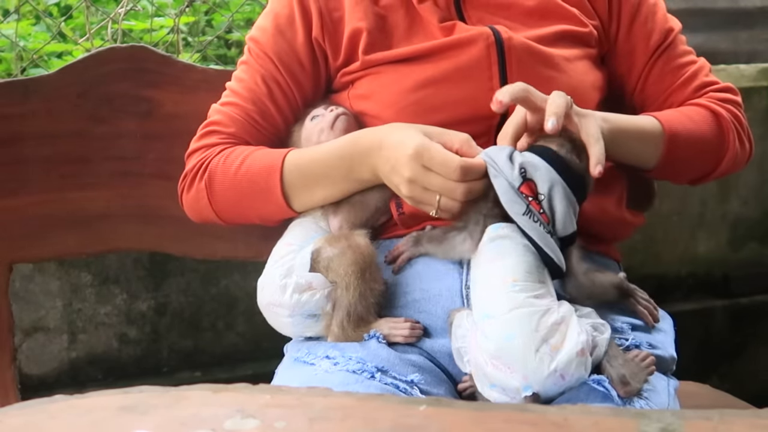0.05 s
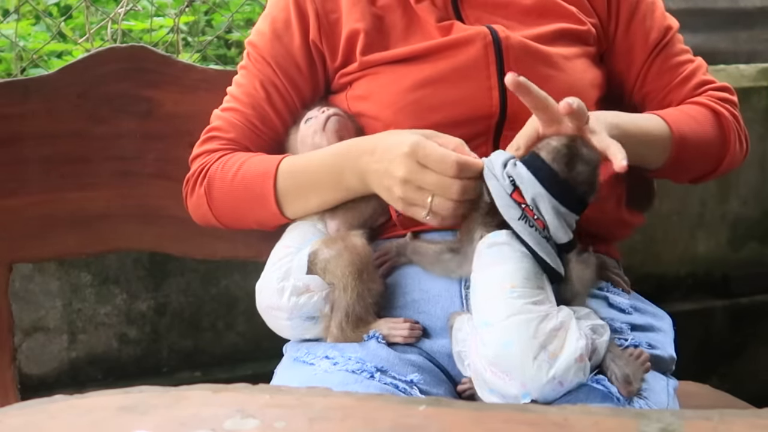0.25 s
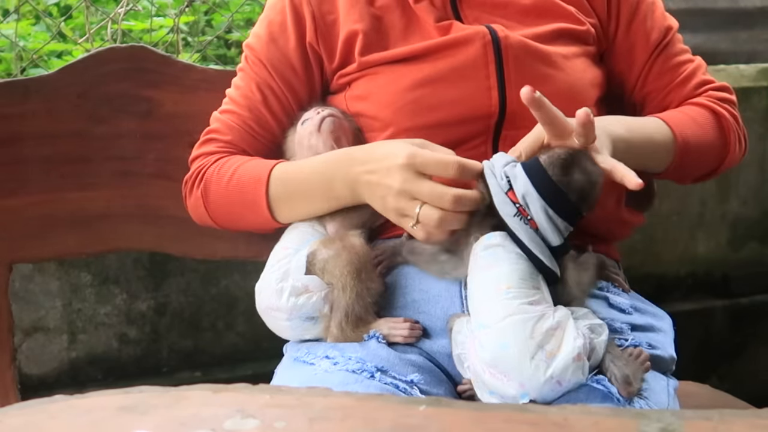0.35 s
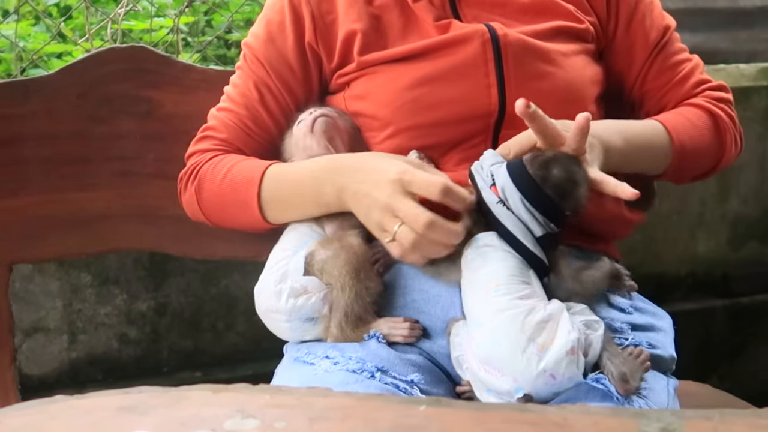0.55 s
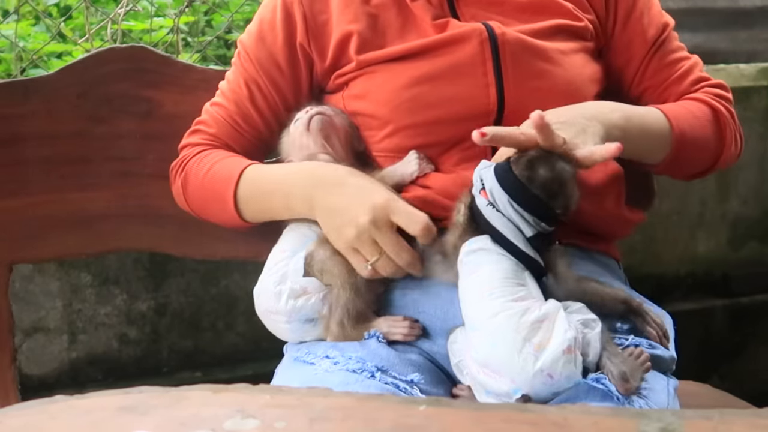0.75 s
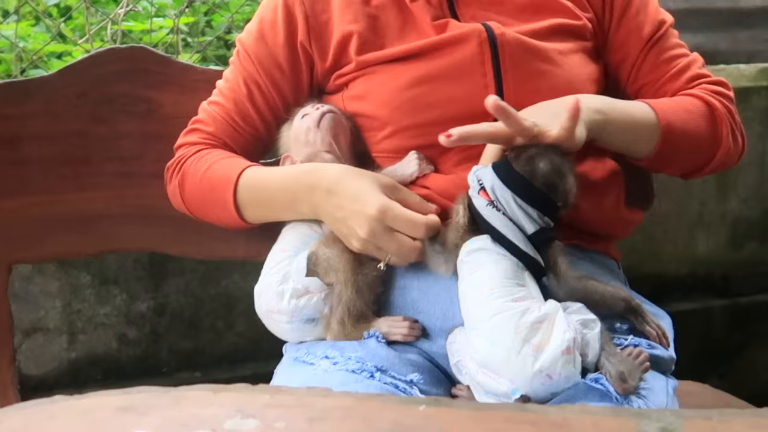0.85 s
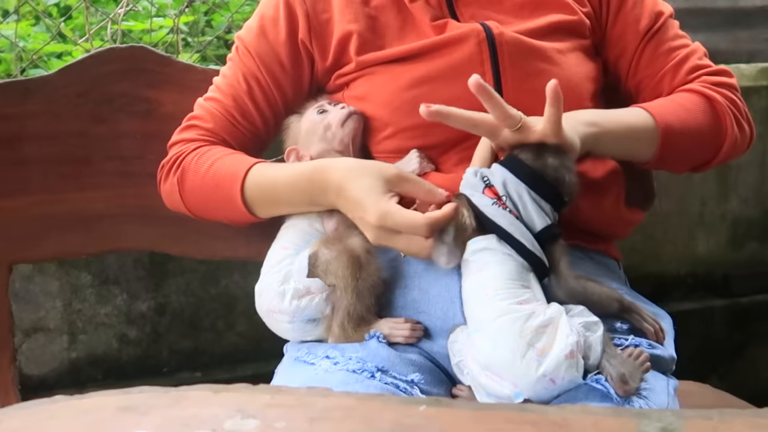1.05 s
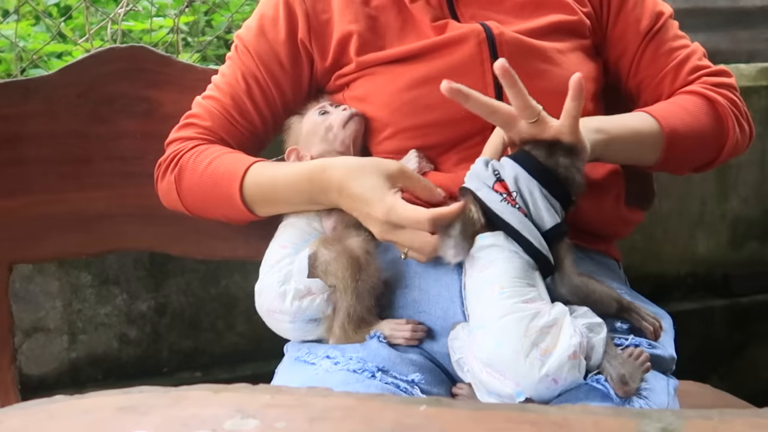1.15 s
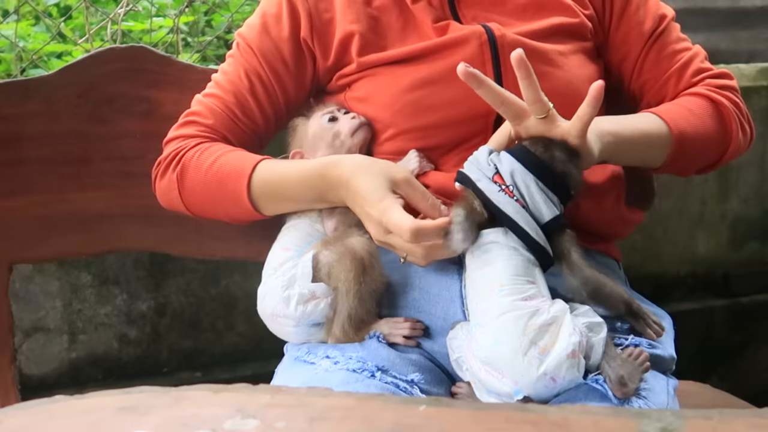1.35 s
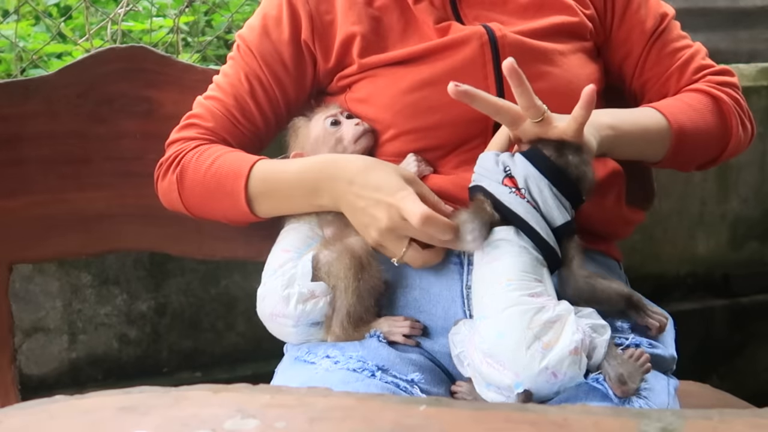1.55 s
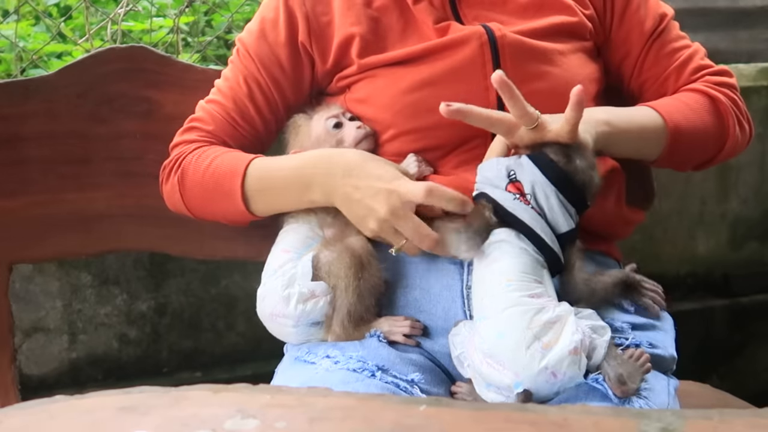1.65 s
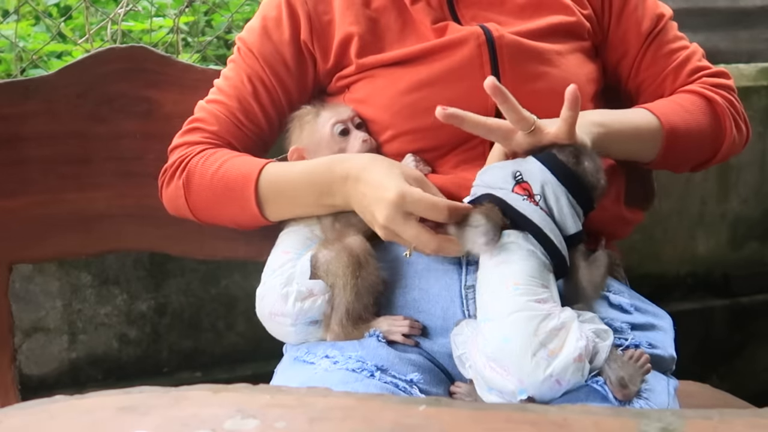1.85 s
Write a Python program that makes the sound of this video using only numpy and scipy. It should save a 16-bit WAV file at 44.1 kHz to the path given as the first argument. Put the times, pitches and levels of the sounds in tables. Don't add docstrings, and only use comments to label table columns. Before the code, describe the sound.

A baby monkey gives a quick chirp, then another nearer one holds a wavering squeal that leaps upward, breaks into thin whistling and falls into a loud cry, over cloth rustle and breeze, close under a porch.

```python
import sys
import numpy as np
from scipy import signal
from scipy.fft import rfft, irfft
from scipy.io import wavfile
from scipy.ndimage import uniform_filter1d

SR = 44100
rng = np.random.default_rng(int(sys.argv[2]) if len(sys.argv) > 2 else 0)


def makeup_ratio(level_db):
    decades = np.asarray(level_db, float) / 20
    return 10 ** decades


def persist_wave(psi):
    counts = np.round(np.clip(psi, -1, 1) * 32767).astype(np.int16)
    wavfile.write(sys.argv[1], SR, np.atleast_2d(counts).T)


N = 83790

HUM_DB = [-72, -71, -71, -71]
# [t/s, level/dB]
GUST = [
    (0.0, -36),
    (0.026, -36),
    (0.238, -38),
    (0.274, -44),
    (0.576, -40.5),
    (0.65, -51.5),
    (0.702, -39),
    (1.286, -58),
    (1.316, -62.5),
    (1.9, -91.5),
]
# [f/Hz, level/dB]
WIND = [(25, -43), (60, -20), (110, -6.5), (370, -18.5), (550, -25.5), (1000, -29), (1500, -64)]
# [t/s, level/dB]
FLUTTER = [
    (0.0, -50),
    (0.03, -34.5),
    (0.184, -29),
    (0.238, -46.5),
    (0.37, -39),
    (0.92, -61.5),
    (0.956, -49),
    (1.602, -99.5),
    (1.9, -100),
]
# [t/s, level/dB]
RUSTLE = [
    (0.0, -41),
    (0.12, -45.5),
    (0.338, -52),
    (0.724, -45.5),
    (0.888, -52),
    (1.136, -54),
    (1.258, -51),
    (1.486, -62),
    (1.666, -59.5),
    (1.9, -64.5),
]
# [f/Hz, level/dB]
CLOTH = [(100, -8.5), (300, -4.5), (600, -5), (3000, -7.5), (4500, -19.5), (7500, -23.5), (10000, -48),
         (15000, -61)]
# [f/Hz, side over mid/dB]
CLOTH_SIDE = [(60, -45), (200, -23), (380, -15), (700, -18), (1300, -12), (2400, -8), (7500, 5),
              (12000, 16)]
# [f/Hz, level/dB]
SLEEVE = [(387.5, -30), (1550, 0), (6200, -50)]
# [t/s, peak level/dB]
TICKS = [(.030, -27), (.036, -26), (.047, -26), (.061, -21), (.091, -25), (.103, -28), (.110, -26),
         (.130, -30), (.161, -28), (.370, -35), (.405, -36), (.557, -14), (.8462, -22), (1.165, -30),
         (1.205, -31), (1.570, -46), (1.663, -39), (1.672, -43)]
# [f/Hz, level/dB]
TICK_COLOUR = [(300, -22), (1500, -6), (3000, 0), (6000, -8), (10000, -10), (15000, -24)]
# [f/Hz, left leads/rad]
PORTS = [(100, 0), (1900, .2), (2400, .9), (3500, 1.3), (4600, 2.2), (6000, 2.5), (10000, 3.15),
         (12500, 3.85)]
# [f/Hz, left over right/dB]
PAN = [(1000, 0), (2300, 1), (3500, 2.5), (4700, 1.6), (6000, 0)]
# [f/Hz, level/dB]
ECHO = [(2000, -2), (3200, 2), (4200, -1), (6100, -4), (7500, 0), (10000, -5), (12300, 4), (15000, -16)]

# [t/s, f/Hz, level/dB, roughness 0-1]
PEEP = [
    (.2135, 3000, -40, .05),
    (.2155, 3000, -29, .05),
    (.218, 2950, -42, .1),
]
# [t/s, f/Hz, level/dB, roughness 0-1]
CHIRP = [(.2235, 3060, -18, .05), (.2285, 3110, -9, .05), (.2315, 3130, -9, .1), (.2345, 3150, -16, .2),
         (.237, 3150, -28, .5), (.2395, 3300, -11, .3), (.2415, 3400, -24, .4), (.245, 3600, -12, .3),
         (.252, 3720, -11, .16), (.260, 3800, -13, .06), (.270, 4080, -11, .03), (.278, 4130, -11, .03),
         (.282, 4120, -16, .05), (.291, 4080, -21, .06), (.295, 3750, -20, .06), (.2985, 3250, -32, .1)]
# [t/s, f/Hz, level/dB, roughness 0-1]
SQUEAL = [(.456, 2130, -30, .02), (.459, 2140, -19, .02), (.474, 2200, -14, .02), (.492, 2180, -15, .02),
          (.508, 2300, -12, .02), (.538, 2380, -14, .02), (.548, 2275, -17, .02), (.575, 2320, -15, .02),
          (.608, 2385, -19, .02), (.636, 2352, -13, .02),
          (.668, 2382, -20, .03), (.695, 2440, -15, .03), (.716, 2370, -20, .04), (.75, 2340, -17, .04),
            (.762, 2365, -17, .05), (.776, 2490, -14, .08), (.79, 2410, -19, .08), (.803, 2365, -24, .08),
            (.816, 2360, -21, .05), (.836, 2400, -17, .05), (.8465, 2520, -14, .1)]
# [t/s, f/Hz, level/dB, roughness 0-1]
RISE = [(.8462, 3700, -8, .08), (.851, 3580, -13, .04), (.869, 3420, -14, .03), (.884, 3400, -25, .04),
        (.895, 3530, -13, .03), (.906, 3850, -11, .04), (.913, 4150, -9, .06), (.917, 4450, -22, .2),
        (.926, 4750, -25, .3), (.946, 5100, -26, .35), (.955, 5650, -19, .2), (.985, 6620, -29, .35),
        (1.008, 6850, -33, .5), (1.025, 7600, -27, .3), (1.038, 8400, -31, .5), (1.048, 8600, -41, .9),
        (1.07, 9000, -44, 1)]
# [t/s, f/Hz, level/dB, roughness 0-1]
GASP = [
    (1.03, 8000, -42, 1),
    (1.05, 8000, -36, 1),
    (1.09, 8000, -41, 1),
    (1.15, 8000, -52, 1),
]
# [t/s, f/Hz, level/dB, roughness 0-1]
WHISTLE = [(1.04, 11500, -31, .4), (1.055, 12200, -36, .5), (1.07, 12750, -27, .3), (1.076, 12500, -31, .4),
           (1.080, 11100, -24, .25), (1.097, 11800, -31, .4), (1.102, 12480, -21, .15),
           (1.122, 12300, -23, .3), (1.136, 13150, -19, .2), (1.148, 13200, -20, .2),
           (1.160, 12600, -18, .25), (1.176, 12750, -19, .3), (1.188, 13220, -16, .08),
           (1.203, 13270, -17, .1), (1.212, 11600, -23, .4)]
# [t/s, f/Hz, level/dB, roughness 0-1]
FALL = [(1.2, 8100, -33, .4), (1.212, 7500, -21, .3), (1.226, 6500, -23, .35), (1.24, 6120, -14, .15),
        (1.252, 5950, -18, .3), (1.262, 6050, -13, .2), (1.265, 5400, -19, .3), (1.279, 5100, -20, .3),
        (1.29, 4250, -4, .02), (1.304, 3750, -9, .02), (1.307, 3450, -15, .05), (1.313, 3150, -40, .1)]
CHIRP_DB = [1, -45]
SQUEAL_DB = [-12, -1.5, -9, -20.5, -34.5, -34.5]
RISE_DB = [0, -20, -29, -35]
FALL_DB = [0, -33, -31]
# [f/Hz, level/dB]
BREATH = [(2400, -32), (3400, -8), (4500, 0), (6000, 0), (7500, -4), (9500, -9), (12500, -5), (15500, -14)]
CHIRP_BREATH = BREATH[:4] + [(9000, -28)]
SQUEAL_BREATH = BREATH[:3] + [(5500, -14.5), (15500, -18.5)]
GASP_BREATH = BREATH[:4] + [(8000, -3), (9500, -25)]
WHISTLE_BREATH = [(2400, -27), (4000, -9), (6000, -13), (8000, -6),
                  (9500, -4), (12500, 3), (14000, 0), (15500, -12)]

NEAR_SIDE, FAR_SIDE = 0.88, -0.39
HALF_TONE_DB, SHAKE_HZ, JITTER, EDGE_S = -19.5, 268, 0.014, 0.00062
RASP_HZ, RASP_DB = 1800, 0
OPEN_DB, OPEN_S = -24, .09
STRAIN_DB = 45
WALL_S, FIRST_DB = .014, -8
ROOM_DB, ROOM_T60_S, TAIL_DB, TAIL_T60_S = -12, 0.21, -23.5, 0.57
BRUSH_S, BRUSH_DB, BRUSH_T60_S = .557, -41, .6
DUCK_S, DUCK_DB, RECOVER_S = 1.296, -18, .09


def shape(table):
    hz, db = np.transpose(table)
    log_hz = np.log(np.arange(N // 2 + 1) * SR / N + 1)
    return np.interp(log_hz, np.log(hz), db)


def colour(x, table):
    return irfft(rfft(x) * makeup_ratio(shape(table)), N)


def unit(x):
    return x / np.sqrt(np.mean(x ** 2))


def curve(table, axis=1):
    table = np.array(table)
    return np.interp(np.arange(N) / SR, table[:, 0], table[:, axis])


def walk(hz):
    k = max(int(SR / hz), 1)
    return unit(uniform_filter1d(uniform_filter1d(rng.standard_normal(N), k), k))


def ports(x, side):
    lead = side * np.array([[1], [-1]]) / 2
    return irfft(rfft(x) * np.exp(1j * lead * shape(PORTS)) * makeup_ratio(lead * shape(PAN)), N)


def motor_hum():
    t = np.arange(N) / SR
    return sum(makeup_ratio(db + 3 * walk(20)) * np.sin(2 * np.pi * 297 * (k + 1) * t) for k, db in enumerate(HUM_DB))


def air(table, flicker_db):
    mid = rfft(rng.standard_normal(N)) * makeup_ratio(shape(table))
    side = rfft(rng.standard_normal(N)) * makeup_ratio(shape(table) + shape(CLOTH_SIDE))
    octaves = np.log2(np.arange(N // 2 + 1) * SR / N + 1)
    out = 0
    for octave in range(4, 15):
        band = np.clip(1 - abs(octaves - octave), 0, 1)
        stereo = irfft(mid * band, N) + np.array([[1], [-1]]) * irfft(side * band, N)
        out = out + makeup_ratio(flicker_db * walk(18.2)) * stereo
    return unit(out)


def breeze():
    level = makeup_ratio(curve(FLUTTER) + 1 + 2.2 * walk(12))
    hz = 53 * (1 + 0.13 * walk(13))
    flutter = level * np.sin(2 * np.pi * np.cumsum(hz) / SR)
    return makeup_ratio(curve(GUST)) * air(WIND, flicker_db=0.5) + flutter


def rustle():
    return makeup_ratio(curve(RUSTLE) + 6) * air(CLOTH, flicker_db=3.5)


def brush():
    t = np.arange(N) / SR - BRUSH_S
    drag = unit(colour(rng.standard_normal(N), SLEEVE))
    return (t > 0) * makeup_ratio(BRUSH_DB - 60 * np.abs(t) / BRUSH_T60_S) * drag


def ticks():
    out, n = np.zeros(N), np.arange(400)
    for s, db in TICKS:
        i = int(s * SR)
        grain = rng.standard_normal(len(n))
        out[i:i + len(n)] += makeup_ratio(db) * grain * np.exp(-n / SR / .0011)
    return colour(out, TICK_COLOUR)


def porch(x):
    t = np.arange(SR) / SR
    near, far = rng.standard_normal((2, 2, SR)) * (t > .004) / 40
    far = signal.lfilter(*signal.butter(2, 7500, fs=SR), far)
    early = near * makeup_ratio(ROOM_DB + FIRST_DB * (t < WALL_S) - 60 * t / ROOM_T60_S)
    tail = far * makeup_ratio(TAIL_DB - 60 * t / TAIL_T60_S)
    left, right = signal.fftconvolve(colour(x, ECHO)[None], early + tail, axes=1)[:, :N]
    return ports(left, 0.658) + ports(right, -0.24)


def call(rows, tones_db, breath_db, half=0., muffle_db=0., strain_db=0., breath=BREATH):
    start, end = rows[0][0], rows[-1][0]
    t, rough = np.arange(N) / SR, np.clip(curve(rows, axis=3), 0, 1)
    hz = uniform_filter1d(curve(rows), size=100) * (1 + JITTER * np.sqrt(rough) * walk(SHAKE_HZ))
    turn = 2 * np.pi * np.cumsum(hz) / SR
    gate = np.clip(np.minimum(t - start, end - t) / EDGE_S, 0, 1)
    shut = muffle_db * np.exp(-np.abs(t - start) / OPEN_S)
    tone = np.zeros(N)
    for k, db in enumerate(tones_db):
        level = db + shut * ((k > 1) - 0.17 * (k == 0))
        level = level + strain_db * np.minimum(rough, .35) * (k == 1)
        audible = (k + 1) * hz < .45 * SR
        waver = 1 + k * rough * walk(60)
        tone += makeup_ratio(level) * np.sin((k + 1) * turn) * audible * waver
    shake = 1 + rough * (0.85 * walk(2 * SHAKE_HZ) + makeup_ratio(RASP_DB) * walk(RASP_HZ))
    half_tone = half * rough * makeup_ratio(HALF_TONE_DB) * 2 * np.sin(turn / 2)
    hiss = makeup_ratio(breath_db + 2 * walk(36)) * rough * unit(colour(rng.standard_normal(N), breath))
    return gate * makeup_ratio(curve(rows, axis=2)) * (np.sqrt(2) * (tone * shake + half_tone) + hiss)


def far_monkey():
    chirp = call(CHIRP, CHIRP_DB, breath_db=-8.0, half=0.76, breath=CHIRP_BREATH)
    return chirp + call(PEEP, CHIRP_DB, breath_db=-20)


def near_monkey():
    squeal = call(SQUEAL, SQUEAL_DB, breath_db=-18.5, muffle_db=OPEN_DB, breath=SQUEAL_BREATH)
    rise = call(RISE, RISE_DB, breath_db=-1, half=.2, strain_db=STRAIN_DB / 2)
    fall = call(FALL, FALL_DB, breath_db=-1, half=.2, strain_db=STRAIN_DB)
    gasp = call(GASP, [-60], breath_db=0, breath=GASP_BREATH)
    whistle = call(WHISTLE, [0], breath_db=0, breath=WHISTLE_BREATH)
    return squeal + rise + fall + gasp + whistle


def scene():
    t = np.arange(N) / SR
    near, far = near_monkey(), far_monkey()
    duck = makeup_ratio(DUCK_DB * (t > DUCK_S) * np.exp(-np.abs(t - DUCK_S) / RECOVER_S))
    background = duck * (breeze() + rustle() + motor_hum())
    calls = ports(near, NEAR_SIDE) + ports(far, FAR_SIDE) + porch(near + far)
    handling = brush() + 2.09 * ports(ticks(), NEAR_SIDE)
    return background + calls + handling


def low_pass(x):
    return signal.sosfilt(signal.butter(12, 15710, fs=SR, output="sos"), x)


def record(dry):
    mix = np.clip(dry, -1, 1)
    return low_pass(mix)


dry = scene()
out = record(dry)
persist_wave(out)
```